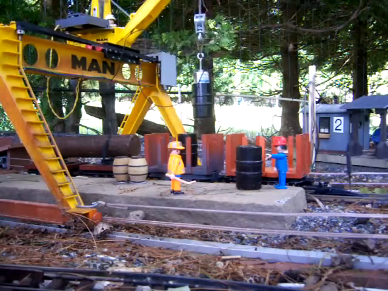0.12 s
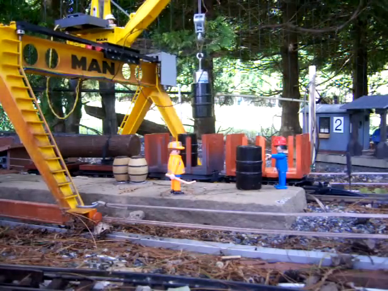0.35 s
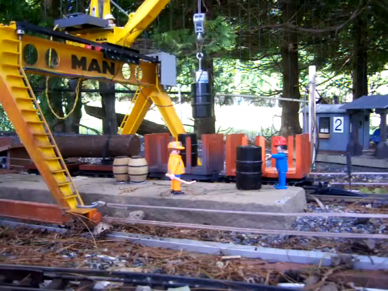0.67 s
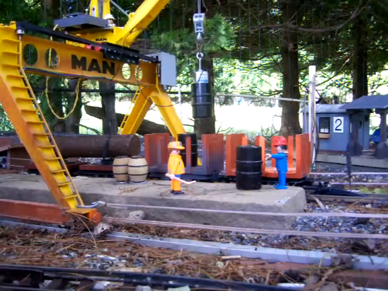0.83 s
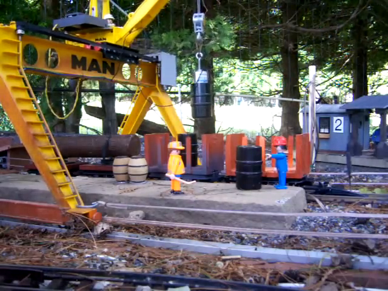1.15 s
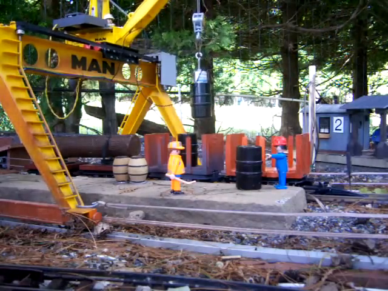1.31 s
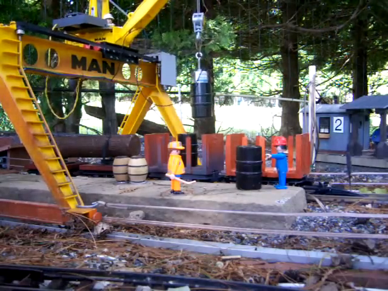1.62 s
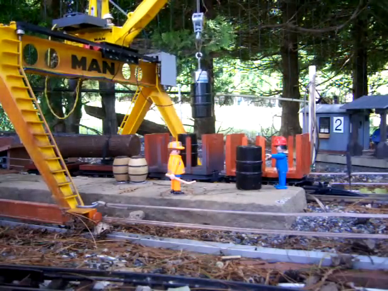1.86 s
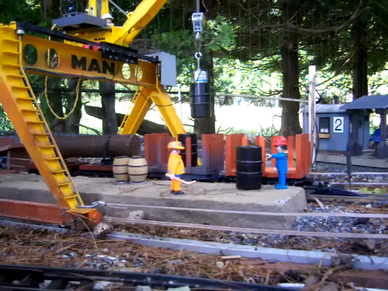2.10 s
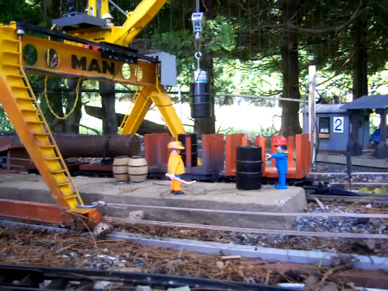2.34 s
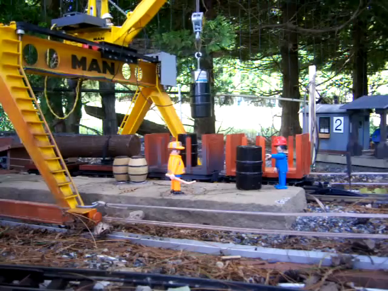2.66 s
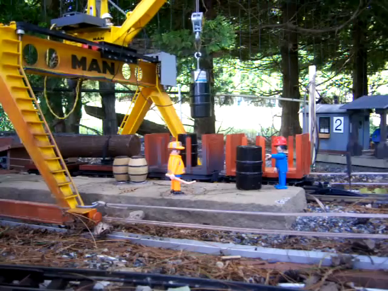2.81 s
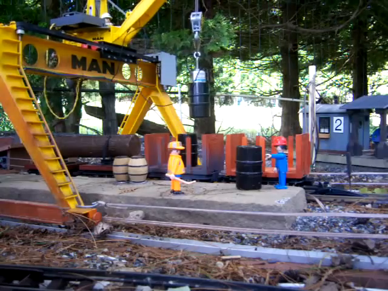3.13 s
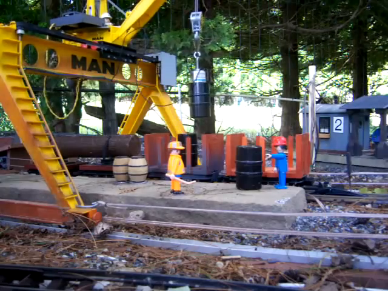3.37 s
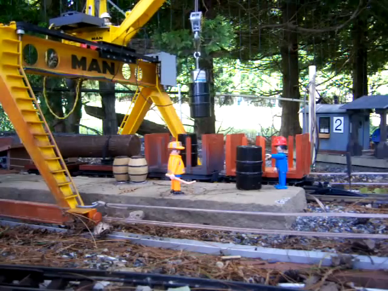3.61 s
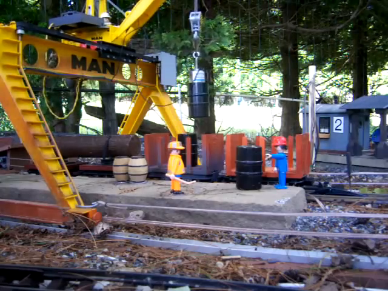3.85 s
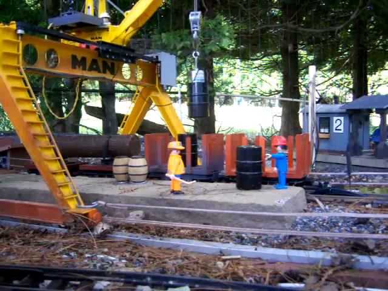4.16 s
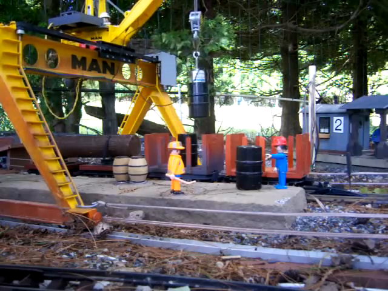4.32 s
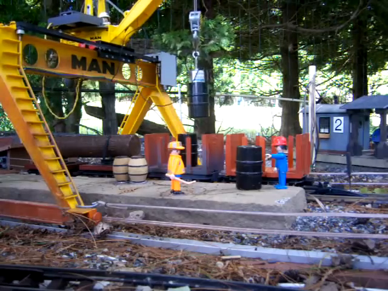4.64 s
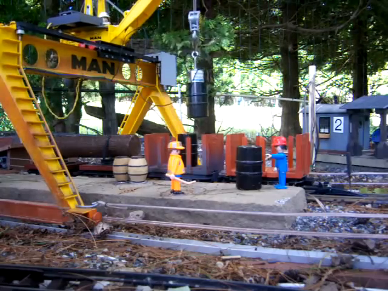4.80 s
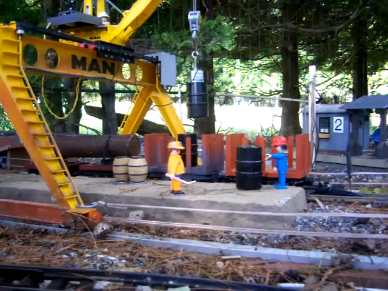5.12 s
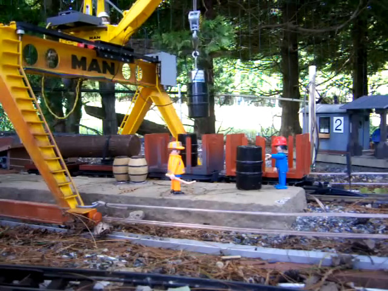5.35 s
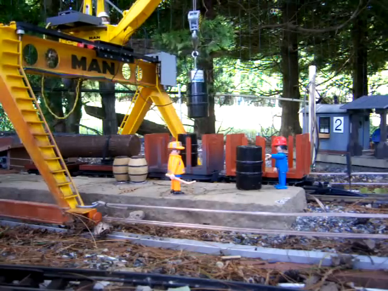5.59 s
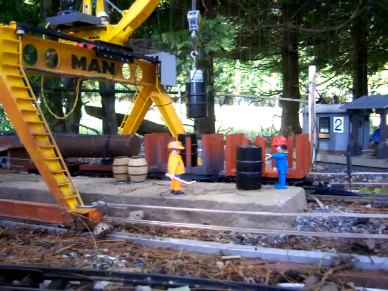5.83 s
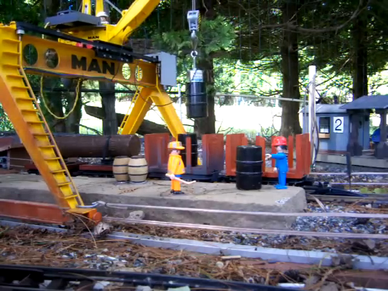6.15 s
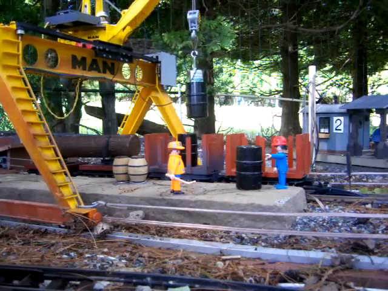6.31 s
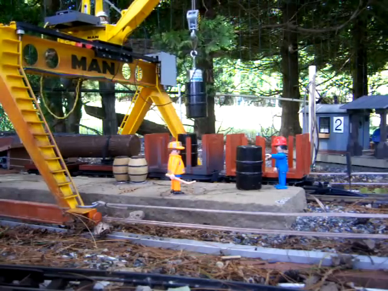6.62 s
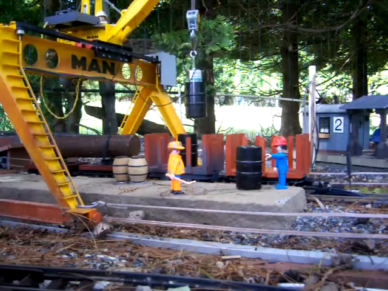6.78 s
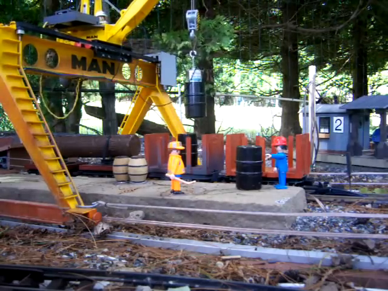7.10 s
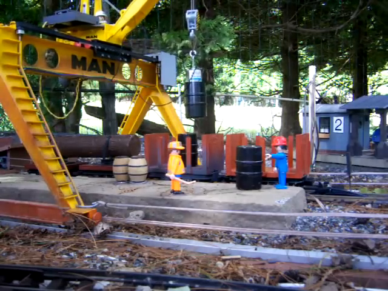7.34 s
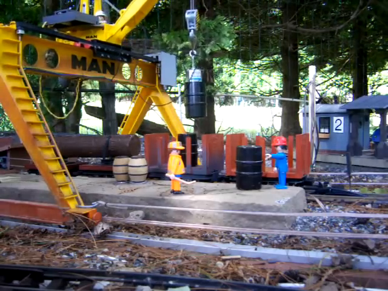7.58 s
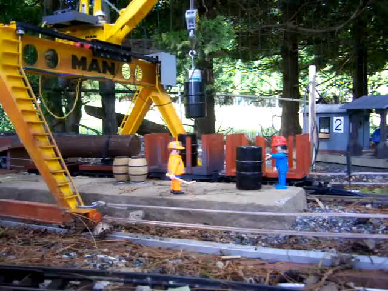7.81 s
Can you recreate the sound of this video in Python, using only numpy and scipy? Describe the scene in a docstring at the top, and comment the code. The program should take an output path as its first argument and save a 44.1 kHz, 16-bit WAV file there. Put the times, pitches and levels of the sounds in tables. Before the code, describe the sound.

A small geared electric motor on a model crane whines continuously, nasal and buzzy, its pitch sinking very slightly as it works. Fine brush noise rasps along with it. Wind puffs softly at first, then gusts grow frequent and strong, thudding directly on the microphone. Faint air, bright hiss and a distant low hum sit behind. Outdoors, close pocket-camera sound, slightly gritty and limited in treble.

```python
"""Outdoors, the small geared hoist motor of a model crane whines steadily, slowing a little as it works.
Sines at multiples of the rotor and gear mesh rates swell and fade; brush noise pulses once a turn.
Gusts are trains of eddies on the microphone, and single eddies, weak or strong, thump it.
Air, hiss and a far hum lie behind.
A pocket camera takes it all at a low sample rate, which mirrors the top of the whine upwards."""
import sys
import numpy as np
from scipy import signal
from scipy.fft import rfft, irfft
from scipy.io import wavfile
from scipy.ndimage import uniform_filter1d, minimum_filter1d

SR = 44100
rng = np.random.default_rng(int(sys.argv[2]) if len(sys.argv) > 2 else 0)


def generate_wav(sig):
    """Save sig (samples, or channels by samples) to the path in sys.argv[1] as 16-bit PCM at SR."""
    pcm = np.round(np.clip(np.atleast_2d(sig).T, -1, 1) * 32767).astype(np.int16)
    wavfile.write(sys.argv[1], SR, pcm)


N = 351036
T = np.arange(N) / SR
BINS_HZ = np.fft.rfftfreq(N, 1 / SR)


def gain_of(db):
    """Decibels to a factor."""
    return 10 ** (np.asarray(db) / 20)


def evened(x):
    """Scales to rms 1."""
    return x / np.sqrt(np.mean(x ** 2) + 1e-20)


def curves(rows):
    """Each column of a timed table, at every sample."""
    time_s, *columns = np.transpose(rows)
    return [np.interp(T, time_s, column) for column in columns]


def coloured(x, points):
    """Filters by a (hz, db) spectrum, interpolated over log frequency."""
    hz, db = np.transpose(points)
    response_db = np.interp(np.log(BINS_HZ + 1), np.log(hz), db)
    return irfft(rfft(x) * gain_of(response_db), N)


def noise(points):
    """Noise of rms 1 with the given spectrum."""
    return evened(coloured(rng.standard_normal(N), points))


def drift(rate_hz):
    """Smooth chance of rms 1, moving mostly below the given rate."""
    count = 4096
    hz = np.fft.rfftfreq(count, T[-1] / count)
    spectrum = rfft(rng.standard_normal(count)) / (1 + (hz / rate_hz) ** 4)
    slow = irfft(spectrum, count)
    return np.interp(T, np.linspace(0, T[-1], count), evened(slow))


def tone(turns, rms_db):
    """A sine that follows a count of turns, from a random phase."""
    return np.sqrt(2) * gain_of(rms_db) * np.sin(2 * np.pi * (turns + rng.random()))


# rotor speed before hunting: time_s, speed_turns_per_s
ROTOR_SPEED = [(0.0, 241.9), (0.68, 240.8), (0.94, 242.0), (1.06, 241.1), (1.16, 243.8), (1.68, 240.6),
               (1.84, 238.4), (2.02, 239.4), (2.56, 238.9), (2.74, 237.5), (2.86, 238.6), (3.32, 235.8),
               (3.64, 237.4), (3.7, 240.4), (3.96, 237.4), (4.18, 241.3), (4.3, 239.1), (4.84, 235.4),
               (5.54, 234.8), (5.66, 237.0), (5.74, 234.3), (5.98, 235.7), (6.08, 233.7), (6.5, 235.0),
               (6.56, 233.7), (6.8, 235.6), (7.04, 233.9), (7.58, 234.4), (7.64, 232.8), (7.96, 233.8)]


def rotor_speed(hunt_turns_per_s=0.2524, hunt_hz=9.1):
    """The rotor slows under load; the uneven drag of the winch makes it hunt a little."""
    return curves(ROTOR_SPEED)[0] + hunt_turns_per_s * drift(hunt_hz)


# speeds at which the overtone levels are given: speed_turns_per_s
LEVEL_SPEEDS = (234, 236, 238.7, 241.7)
# fifth, sixth and eleventh overtones against time: time_s, fifth_db, sixth_db, eleventh_db
SWELLS = [(0, -45, -35.5, -46), (.42, -41, -37, -48), (.54, -43, -48, -50), (.6, -41.5, -38, -48.5),
          (1.25, -44.5, -40, -48), (1.68, -38, -53.5, -57.5), (2.98, -38, -50, -52.5),
          (3.12, -39, -49, -50), (3.63, -39, -51, -51), (3.7, -37, -53, -55), (4.46, -40, -54, -51),
          (4.58, -40, -46, -53), (5.5, -47, -41, -49), (7.95, -50, -49, -52)]
# seventh overtone against time: time_s, level_db
SEVENTH = [(.15, -45), (.5, -53), (1.2, -44), (2.5, -44.5), (3.4, -40.5), (4.9, -51), (5.35, -41.5),
           (6.34, -45.5), (6.39, -58), (6.68, -52), (6.86, -40.5), (7.06, -41), (7.25, -58.5), (7.95, -41)]
# other rotor overtones, before buzz_db: order, then level_db at each of LEVEL_SPEEDS
OVERTONES = [(3, -40, -38.6, -36, -33.3), (4, -54.5, -49, -49, -48), (8, -59, -54.5, -53, -56),
             (9, -52, -51.5, -54.5, -53), (10, -49, -51, -53, -54), (12, -50.5, -50, -53.5, -54),
             (13, -47, -51, -55, -56.5), (15, -52, -53.5, -57.5, -60), (16, -64, -59.5, -54, -58.5),
             (17, -68, -67, -63.5, -57.5), (18, -62.5, -64.5, -57.5, -60.5), (19, -71.5, -71, -63, -58),
             (20, -56.5, -57.5, -59, -67), (22, -62.5, -60.5, -60, -57.5), (23, -61, -68.5, -71, -61),
             (25, -60.5, -52, -54, -52), (27, -60.5, -63, -64.5, -59), (28, -58, -57, -52.5, -57.5),
             (29, -63, -59, -74, -62.5), (30, -74.5, -67.5, -59.5, -62), (31, -64.5, -63, -64.5, -59),
             (32, -48.5, -52.5, -59, -63)]
# gear mesh overtones: multiple of the mesh rate, level_db
MESH = [(1, -64.5), (2, -63), (3, -76.5), (4, -61), (5, -67.5)]
MESH_PER_TURN = 44 / 7  # 44 teeth in 7 rotor turns


def motor(speed, buzz_db=0.34, flutter_db=.5, rattle_db=1.0):
    """Overtones of the rotor and the gear mesh; play in the gears roughens the high ones most."""
    play_turns = .002 * drift(30)
    turns = np.cumsum(speed) / SR + play_turns
    out = np.zeros(N)
    for order, level_db in zip((5, 6, 11, 7), curves(SWELLS) + curves(SEVENTH)):
        out += tone(order * turns, level_db + flutter_db * drift(13))
    for order, *levels_db in OVERTONES:
        level_db = buzz_db + np.interp(speed, LEVEL_SPEEDS, levels_db)
        unsteady_db = np.interp(order, [3, 8], [flutter_db, rattle_db])
        wander_turns = min(.02 * order, .25) * drift(.6)
        out += tone(order * turns + wander_turns, level_db + unsteady_db * drift(12))
    for multiple, level_db in MESH:
        out += tone(multiple * MESH_PER_TURN * turns, level_db + rattle_db * drift(6))
    return out


# brush and gear noise spectrum shape: freq_hz, density_db (per Hz, relative)
RUB = [(300, -26), (800, 5), (1400, -0.5), (2000, -9), (2700, -2), (3050, -1.5), (3250, -4), (3550, -1.5),
       (4000, -8), (4600, -2), (5400, -13.5), (8000, -28.5)]


def rubbing(speed, full_load_db=-45, idle_db=-7.5, pulsing=0.84):
    """Brush noise pulses once a turn and grows as the load drags the speed down."""
    load_db = np.interp(speed, [LEVEL_SPEEDS[0], LEVEL_SPEEDS[-1]], [0, idle_db])
    stroke = 1 + pulsing * np.cos(2 * np.pi * np.cumsum(speed) / SR)
    return gain_of(full_load_db + load_db) * evened(noise(RUB) * stroke)


# single eddies that stand out, weak or strong, before trim and width: time_s, peak_db, centre_hz
THUMPS = [(0.172, -15, 126), (0.28, -16, 117), (0.526, -7, 135), (1.153, -15, 122), (1.803, -11, 137),
          (2.058, -7, 98), (2.116, -1, 120), (2.139, -8.5, 151), (2.169, -10.5, 190), (2.369, -2.5, 106),
          (2.499, -8.5, 133), (2.679, -8, 217), (2.712, -5, 127), (2.807, -7, 97), (2.98, -7.5, 152),
          (3.011, -0.5, 185), (3.025, -2, 205), (3.086, -8, 179), (3.119, -9.5, 175), (3.645, -9, 227),
          (3.831, -9.5, 98), (3.898, -13.5, 191), (4.115, -5.5, 169), (4.238, -2.5, 123), (4.28, -4, 151),
          (4.429, 2.5, 292), (4.449, 6, 150), (4.482, 2, 227), (4.554, -1.5, 152), (4.635, 3, 205),
          (4.655, -2, 178), (4.669, -3, 192), (4.852, -11, 144), (4.904, -11.5, 161.3), (5.073, 1, 169),
          (5.103, -1, 354), (5.122, -4, 213), (5.271, -7, 300), (5.379, -3, 141), (5.528, -8, 161),
          (5.589, -4, 140), (5.663, -0.5, 174), (5.695, -1.5, 163), (5.72, 4, 202), (5.793, -0.5, 185),
          (5.822, -0.5, 178), (5.884, 1, 274), (5.894, 4.5, 204), (5.937, -2.5, 290), (5.967, 1, 212),
          (6.186, -6, 132), (6.268, 5, 183), (6.426, -1.5, 190), (6.478, -0.5, 270), (6.534, 2, 184),
          (6.745, -2.5, 259), (6.765, -2, 166), (6.823, -7.5, 150), (7.04, -4.5, 182), (7.4, -10, 184),
          (7.53, -7, 214), (7.568, -9, 324), (7.657, -11, 177), (7.702, 4.5, 240), (7.801, -7, 173),
          (7.895, -2, 141)]


def thumps(trim_db=-1.53, width=1.04):
    """An eddy crosses the port as one push and pull of pressure; small eddies pass faster."""
    out = np.zeros(N)
    for (time_s, peak_db, centre_hz), lean_turns in zip(THUMPS, rng.random(len(THUMPS))):
        near = abs(T - time_s) < .03
        passage = 2 * (T[near] - time_s) * centre_hz / width
        swing = np.exp(2j * np.pi * lean_turns) / (1 - 1j * passage) ** 3.7
        out[near] += gain_of(trim_db + peak_db) * swing.real
    return out


# gusts, before trims: start_s, length_s, rumble_db, flutter_db (relative to rumble)
GUSTS = [(0.115, 0.2, -28.5, -17), (0.435, 0.22, -25.0, -16.5), (0.814, 0.19, -28.5, -14),
         (1.689, 0.33, -27.5, -18), (2.046, 0.16, -19.5, -13), (2.439, 0.087, -24, -24),
         (2.648, 0.17, -20, -11.5), (2.886, 0.28, -21.5, -10.5), (3.207, 0.3, -24.5, -19),
         (3.592, 0.035, -28, -11), (3.75, 0.16, -27, -21), (4.019, 0.11, -20, -9), (4.18, 0.18, -20, -14),
         (4.398, 0.274, -18, -9), (4.796, 0.35, -27.0, -13), (5.021, 0.13, -14, -7),
         (5.204, 0.21, -21.5, -12), (5.518, 0.095, -21, -13), (5.636, 0.35, -16.5, -5),
         (5.982, 0.14, -20, -8), (6.168, 0.12, -15, -8), (6.351, 0.14, -20, -6), (6.527, 0.025, -13, -13),
         (6.635, 0.14, -17, -8), (6.936, 0.12, -20.5, -12), (7.25, 0.21, -26, -9.5), (7.518, 0.14, -26, -3),
         (7.766, 0.029, -15, -8.5), (7.881, 0.056, -16, -11)]
GUST_RISE_S, GUST_FALL_S = 0.026, 0.027
# breeze between gusts, before trims; its flutter is relative to its rumble
BREEZE_DB, BREEZE_DB_PER_S, BREEZE_FLUTTER_DB = -40.5, 1.31, -11
# flutter burst at a thump, before trim: half length, level re thump, extra for a large slow eddy
WAKE_S, WAKE_DB, SLOW_WAKE_DB = .012, -19.5, -10


def gusting(gust_flutter_trim_db=-3.):
    """Gusts rise out of the breeze and drop back, thumps leave a wake: level_db, relative flutter_db."""
    rumble = gain_of(BREEZE_DB + BREEZE_DB_PER_S * T)
    flutter = rumble * gain_of(BREEZE_FLUTTER_DB)
    for start_s, length_s, rumble_db, flutter_db in GUSTS:
        near = (T > start_s - GUST_RISE_S) & (T < start_s + length_s + GUST_FALL_S)
        t = T[near] - start_s
        corners_s = [-GUST_RISE_S, 0, length_s, length_s + GUST_FALL_S]
        edges = np.interp(t, corners_s, [0, 1, 1, 0]) ** 2
        arch_db = np.interp(t, [0, length_s / 2, length_s], [-.5, .25, -.5])
        shape = edges * gain_of(arch_db)
        rumble[near] = np.maximum(rumble[near], gain_of(rumble_db) * shape)
        gust_flutter = gain_of(rumble_db + flutter_db + gust_flutter_trim_db) * shape
        flutter[near] = np.maximum(flutter[near], gust_flutter)
    for time_s, peak_db, centre_hz in THUMPS:
        near = abs(T - time_s) < 2 * WAKE_S
        wake_db = peak_db + WAKE_DB + np.interp(centre_hz, [110, 250], [SLOW_WAKE_DB, 0])
        wake = gain_of(wake_db) * np.exp(-((T[near] - time_s) / WAKE_S) ** 2)
        flutter[near] = np.maximum(flutter[near], wake)
    return 20 * np.log10(rumble), 20 * np.log10(flutter / rumble)


def eddies(train, points):
    """A train of eddies in one colour; its slow level is kept even."""
    flow = coloured(train, points)
    power = uniform_filter1d(uniform_filter1d(flow ** 2, size=1500), size=800)
    return flow / np.sqrt(power + 1e-12)


# spectrum shapes of slow puff rumble, hard gust rumble, small eddies: freq_hz, density_db (per Hz, relative)
PUFF = [(8, -33), (22, -7), (45, 0.5), (88, 4), (125, -0.5), (170, -8.5), (230, -11.5), (300, -25),
        (420, -48), (900, -77.5)]
RUMBLE = [(8, -35.5), (22, -18.5), (45, 2.5), (80, 8), (160, 5.5), (230, -4.5), (300, -22), (420, -33.5),
          (900, -81)]
FLUTTER = [(120, -27), (230, -3), (320, 3), (400, -1.5), (520, -8.5), (650, -16), (850, -31.5),
           (1500, -56.5), (4000, -100)]


def wind(rumble_trim_db=-0.23, flutter_trim_db=-2.5, puff_db=-26.0, gust_db=-17.0,
         smooth_share=.45, lumpy_db=2.5, lumps_hz=18, strikes_per_s=130):
    """Separate eddies strike the microphone port in lumps; hard gusts rumble higher, sharp ones also flutter."""
    level_db, sharpness_db = gusting()
    level_db = level_db + lumpy_db * np.tanh(drift(lumps_hz))
    sizes = rng.choice([-1, 1], N) * gain_of(2.5 * rng.standard_normal(N))
    strikes = (rng.random(N) < strikes_per_s / SR) * sizes
    train = evened(strikes) + smooth_share * rng.standard_normal(N)
    force = np.clip((level_db - puff_db) / (gust_db - puff_db), 0, 1)
    rumble = (1 - force) * eddies(train, PUFF) + force * eddies(train, RUMBLE)
    flutter = gain_of(flutter_trim_db + sharpness_db) * eddies(train, FLUTTER)
    return gain_of(level_db) * (gain_of(rumble_trim_db) * rumble + flutter)


# far hum: freq_hz, level_db (before wavering)
HUM = [(53.8, -42), (85.5, -46.5), (170.8, -41.5), (191.5, -43), (256, -54), (317, -61.5), (340, -52.5),
       (426, -60.5), (513, -58), (677, -63)]
# air and hiss spectrum shape: freq_hz, density_db (per Hz, relative)
AIR = [(15, -5), (50, 3.5), (150, 9), (300, 2), (550, 0), (1050, 1.5), (1500, -3), (1900, -11.5),
       (3000, -13.5), (3900, -18), (4600, -10), (5200, -10), (8000, -21)]
# bright hiss band spectrum shape: freq_hz, density_db (per Hz, relative)
SIZZLE = [(4500, -39), (5400, -11.5), (5700, -3), (5950, 1.5), (6400, 1.5), (6600, -4.5), (6850, -0.5),
          (7150, -13), (7500, -10), (8000, -14)]


def background(air_db=-42.5, sizzle_db=-41.5, shimmer_db=1.0):
    """Air noise, a shimmering band of bright hiss and a slightly wavering far hum of sines."""
    hum = np.zeros(N)
    for freq_hz, level_db in HUM:
        hum += tone(freq_hz * T + .1 * drift(3), level_db + 1.8 * drift(3))
    air = gain_of(air_db) * noise(AIR)
    sizzle = gain_of(sizzle_db + shimmer_db * drift(40)) * noise(SIZZLE)
    return hum + air + sizzle


def scene():
    """The hoist in front, the background behind it, the wind right on the microphone."""
    speed = rotor_speed()
    hoist = motor(speed) + rubbing(speed)
    return (hoist + background() + wind() + thumps())[None]


def limited(x):
    """A fast limiter rounds off the hardest thumps; what still overshoots is clipped."""
    room = np.minimum(1, 1.1 / (abs(x) + 1e-9))
    held = minimum_filter1d(room, size=180)
    gain = uniform_filter1d(uniform_filter1d(held, size=90), size=90)
    return np.clip(gain * x, -.96, .96)


# leaky output filter of the camera: freq_hz, gain_db
OUTPUT = [(7400, 0), (8000, -2), (8500, -7.5), (9000, -14.5), (9500, -25), (9800, -31.5), (10200, -43.5)]
CAMERA_HZ, EDGE_HZ = 16000, 10293  # sample rate, final low-pass


def record(dry):
    """Peaks are held down; slow sampling mirrors the treble about half the camera's rate."""
    sampled = irfft(rfft(limited(dry[0])) * (BINS_HZ < CAMERA_HZ / 2), N)
    mirrored = sampled * (1 + 2 * np.cos(2 * np.pi * CAMERA_HZ * T))
    edge = signal.firwin(511, EDGE_HZ, window=("kaiser", 9), fs=SR)
    return signal.oaconvolve(coloured(mirrored, OUTPUT), edge, "same")[None]


dry = scene()
out = record(dry)
generate_wav(out)
```